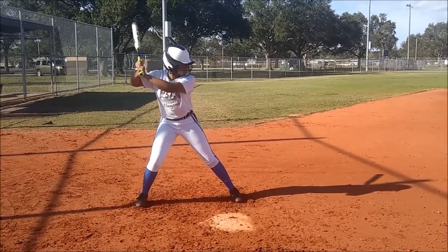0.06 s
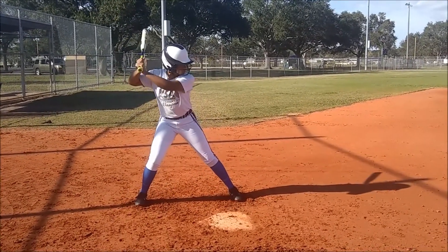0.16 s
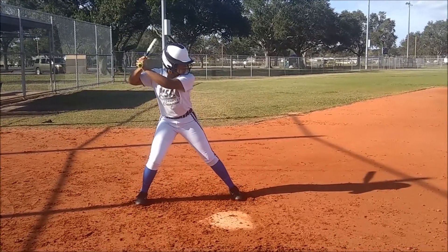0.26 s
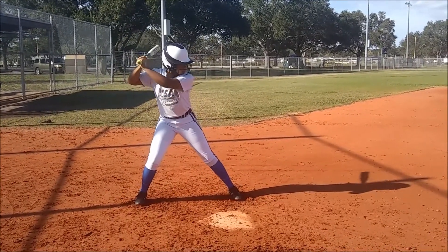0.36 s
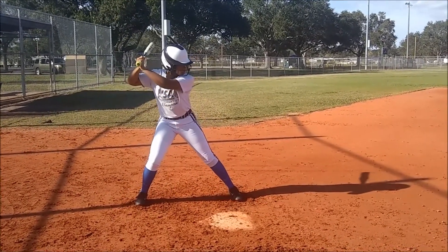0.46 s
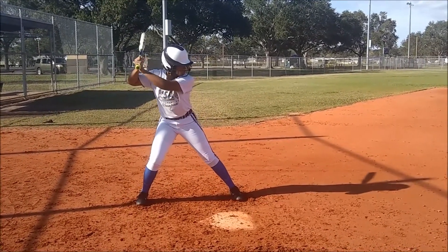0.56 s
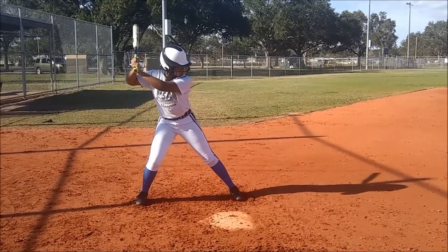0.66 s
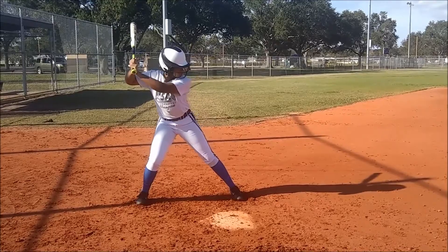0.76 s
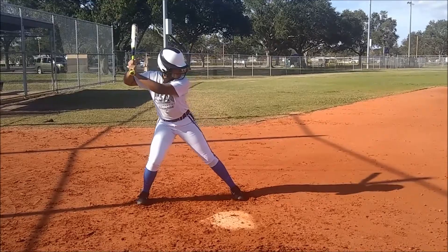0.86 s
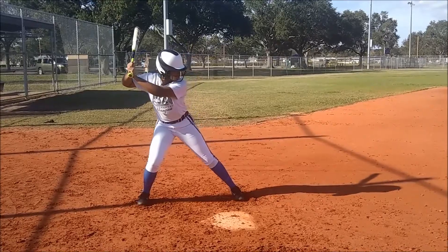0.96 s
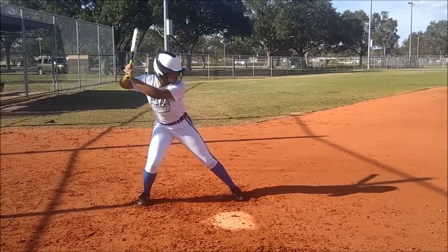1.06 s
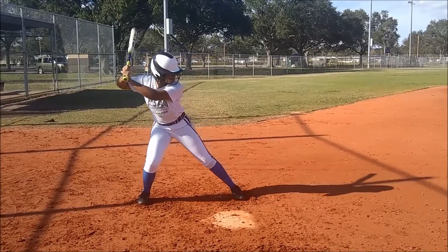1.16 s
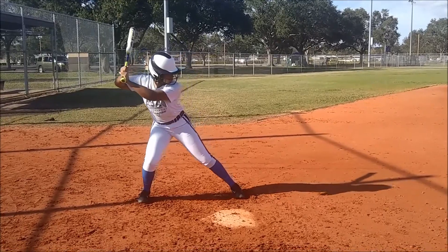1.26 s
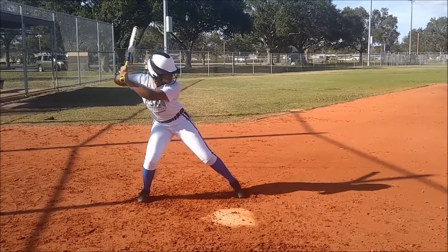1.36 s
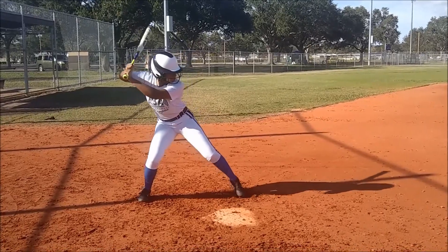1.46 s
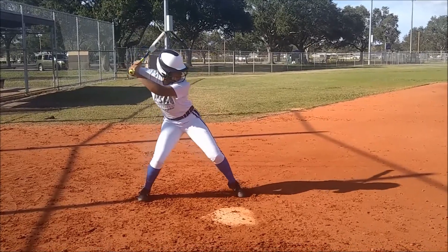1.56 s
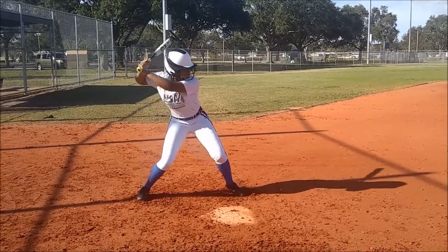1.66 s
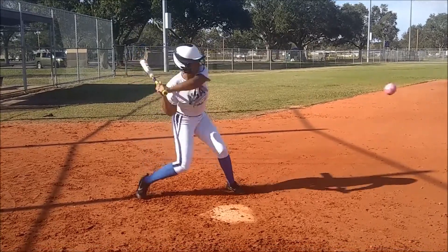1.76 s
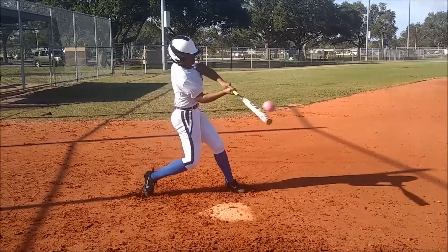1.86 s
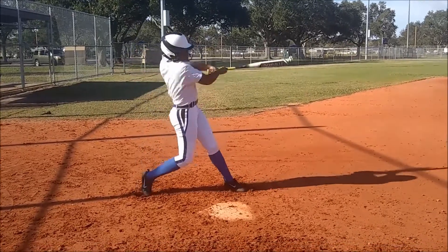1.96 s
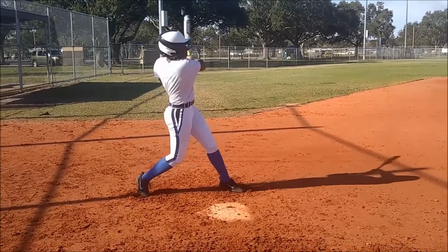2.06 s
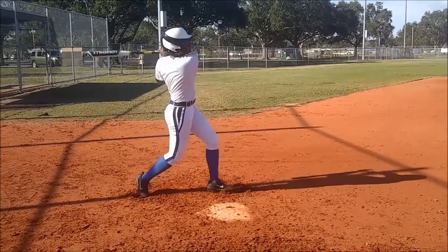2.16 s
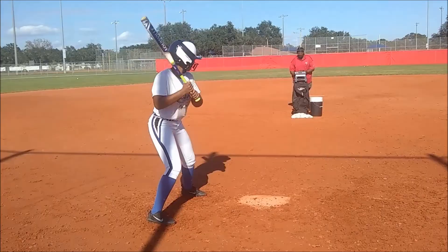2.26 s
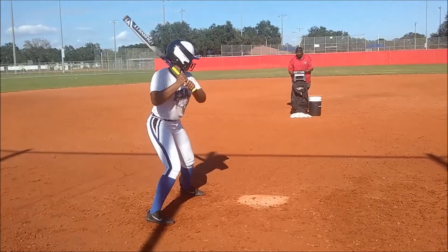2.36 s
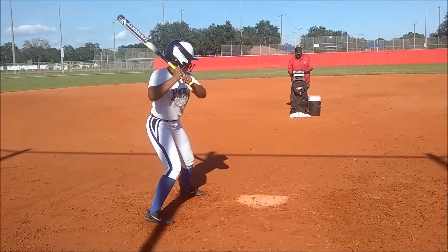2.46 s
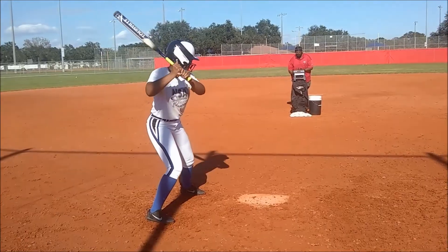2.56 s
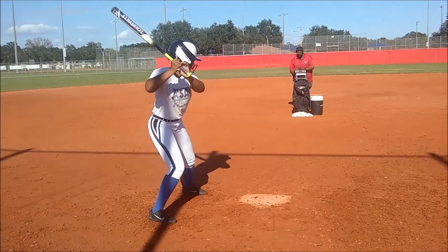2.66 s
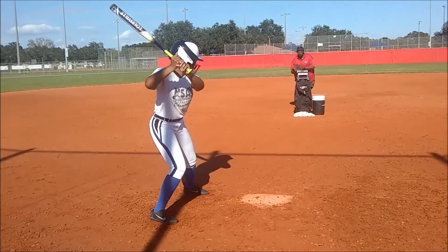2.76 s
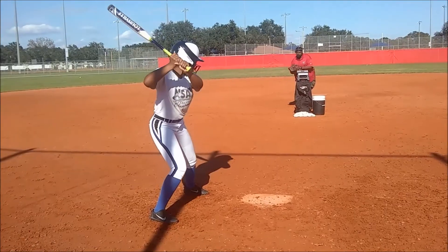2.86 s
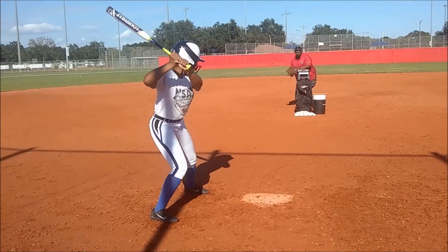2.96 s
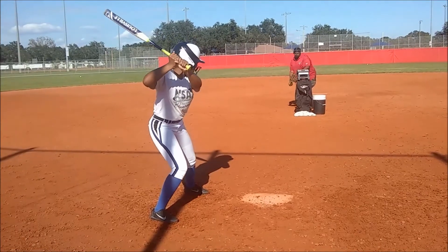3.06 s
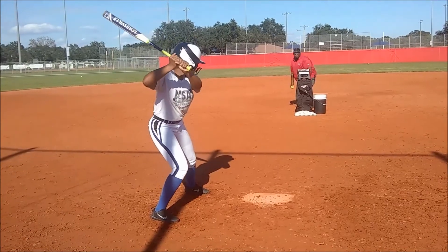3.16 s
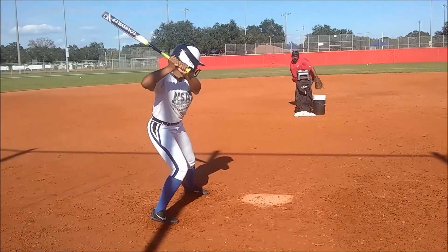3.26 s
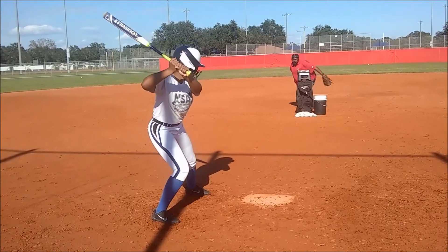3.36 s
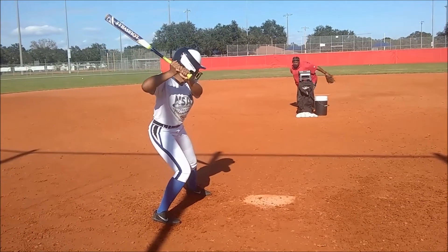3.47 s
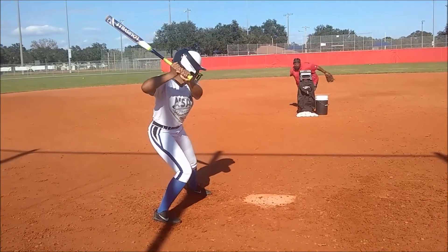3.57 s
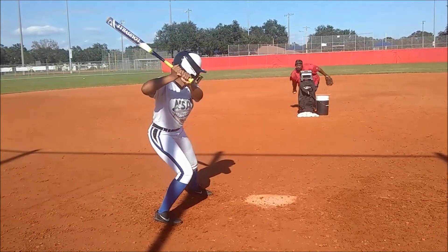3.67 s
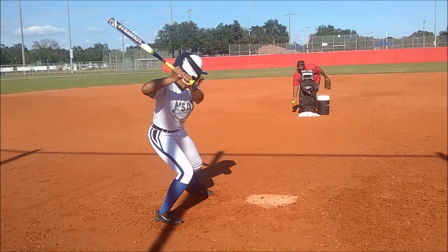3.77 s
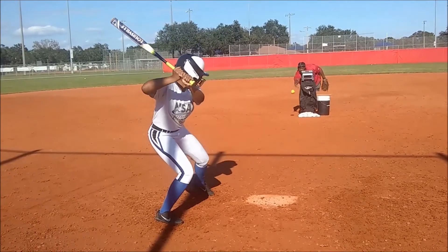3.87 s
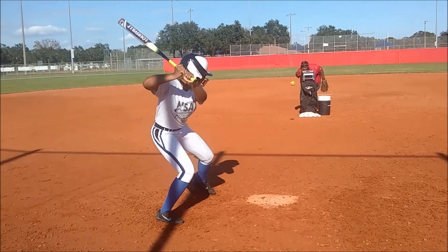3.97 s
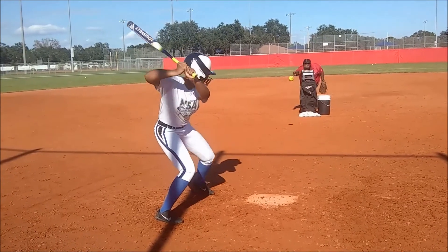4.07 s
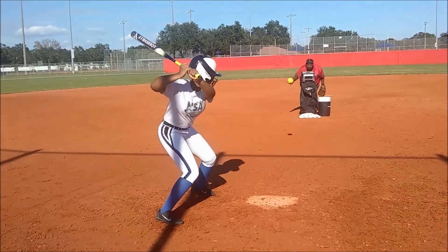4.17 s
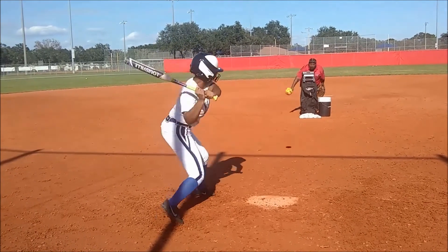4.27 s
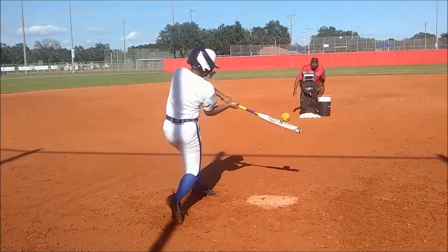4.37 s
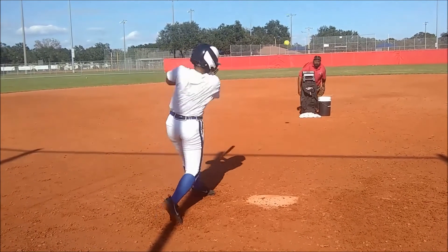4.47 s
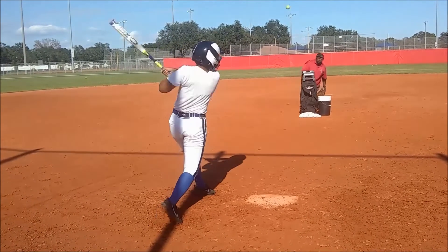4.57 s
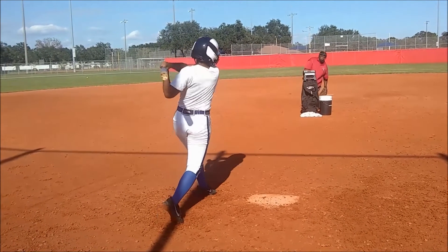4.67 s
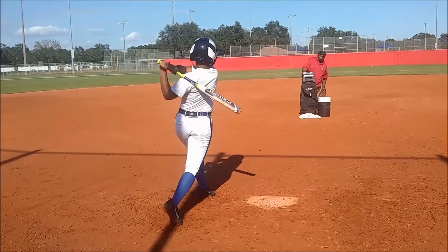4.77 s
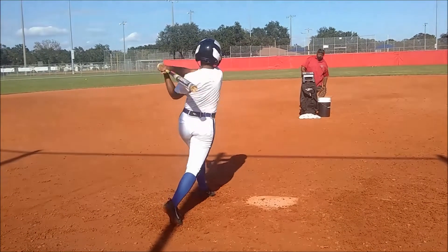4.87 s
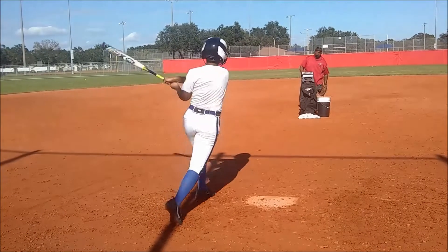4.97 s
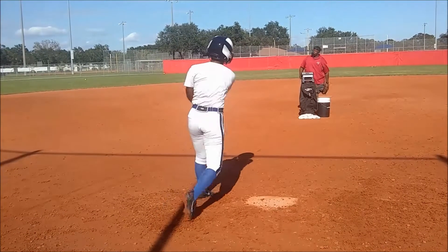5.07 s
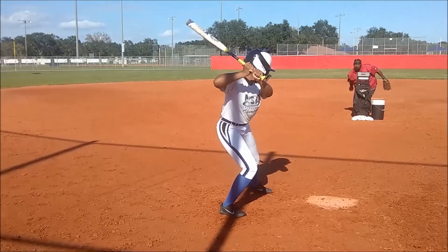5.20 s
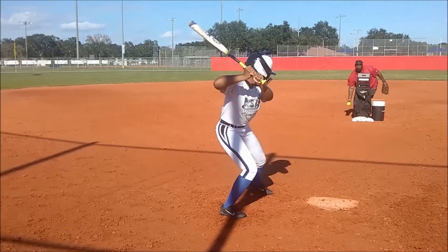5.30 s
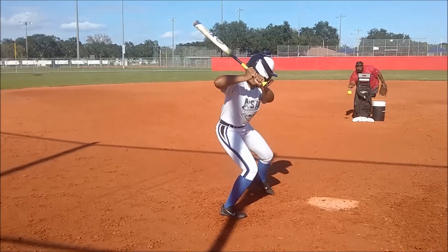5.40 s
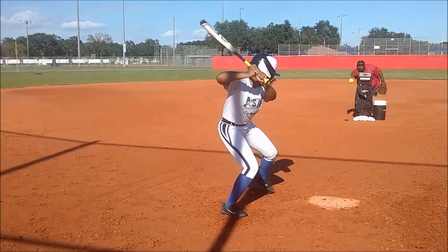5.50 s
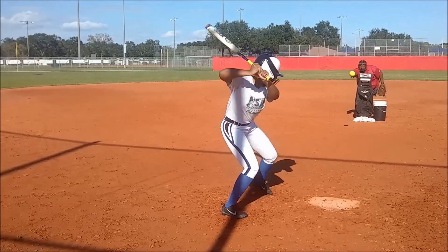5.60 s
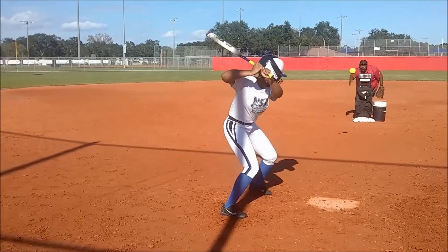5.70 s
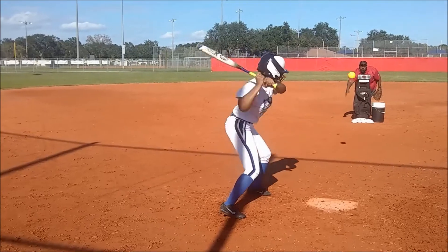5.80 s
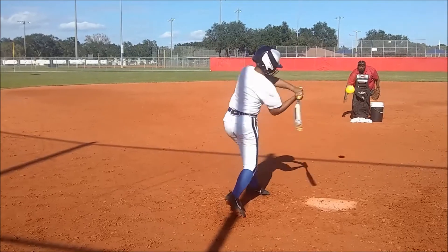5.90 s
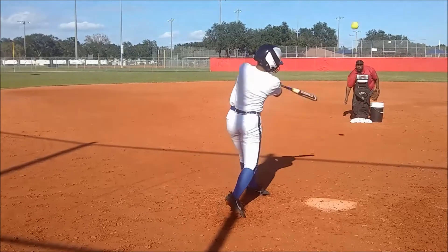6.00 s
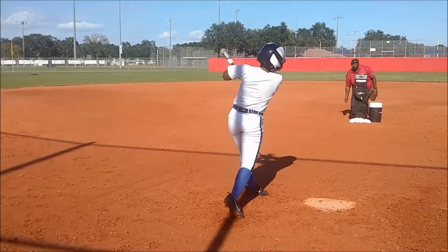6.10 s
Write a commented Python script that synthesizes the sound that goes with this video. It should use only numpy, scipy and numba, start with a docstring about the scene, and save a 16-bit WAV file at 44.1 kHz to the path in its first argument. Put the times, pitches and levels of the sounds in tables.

```python
"""Three softball hits on an open field.

A hollow metal bat cracks and its barrel rings; backstop, ground and fences throw the crack back.
The bat swishes, the batter shifts, far traffic hums and wind buffets mainly the left microphone port.
The two ports are widened by cross-feed, and a gain control ducks after every hit.
Each hit has its own segment, with its own drone and gain; the level dips briefly before the third."""
import sys
import numpy as np
from scipy import signal
from scipy.fft import rfft, irfft
from scipy.io import wavfile
from scipy.ndimage import uniform_filter1d, minimum_filter1d
from numba import njit

SR = 44100
rng = np.random.default_rng(int(sys.argv[2]) if len(sys.argv) > 2 else 0)


def master_out(mix):
    """Clip the mix to full scale and print it as 16-bit PCM to the path in sys.argv[1]."""
    frames = np.transpose(np.atleast_2d(mix))
    ceiling = np.clip(frames, -1, 1)
    pcm = np.round(ceiling * 32767).astype(np.int16)
    wavfile.write(sys.argv[1], SR, pcm)


N = 270774
T = np.arange(N) / SR
SEGMENT_STARTS_S = (0, 2.29, 5.23)


# Ball impacts: (time [s], crack [dB], crack t60 [s], snap [dB], thump [Hz], thump [dB], right lag [ms],
# left minus right [dB], ring build-up [s], ring time left by the grip [ratio])
HITS = [(1.9213, -8.5, 0.034, -12, 525, -0.5, 0.053, 1, 0.00064, 0.59),
        (4.3978, -8, 0.019, -10, 857, -14.5, 0.05, -6, 0.00066, 0.75),
        (5.9855, -10, 0.031, 2, 378, -10.5, 0.059, -3, 0.0034, 0.9)]
# Crack spectrum: (frequency [Hz], density [dB])
CRACK_SPECTRUM = [(200, -11.5), (600, -5.5), (1200, 5), (2500, -7), (5000, -5.5), (8000, -8), (11000, -8),
                  (13800, -16), (14600, -40.5)]
SNAP_T60_S, THUMP_T60_S = 0.006, 0.0098

def bat_hits():
    """Ball on barrel: a noisy crack, a bright snap, a short thump and the ringing shell."""
    noise = diffuse(tint(CRACK_SPECTRUM))
    crack_noise = noise[0] + 0.1 * noise[::-1]  # ground bounce: the ports differ a little
    snap_gains = tint([(3225, -20), (6450, 0), (11500, -1), (14000, -12), (16000, -26)])
    snap_noise = level(diffuse(snap_gains)[0], 0)
    out = np.zeros((2, N))
    for hit, row in enumerate(HITS):
        at_s, crack_db, t60_s, snap_db, thump_hz, thump_db, lag_ms, pan_db, build_s, grip = row
        t = T - at_s
        crack = undb(crack_db) * fall(t, t60_s) * crack_noise
        snap = undb(snap_db) * fall(t, SNAP_T60_S) * snap_noise
        thump = undb(thump_db) * fall(t, THUMP_T60_S) * np.sin(2 * np.pi * thump_hz * t)
        ring = barrel_ring(hit, t, grip) * np.clip(t / build_s, 0, 1)
        direct = snap + thump + ring + barrel_notes(hit)
        out += (crack + [direct, delay(direct, lag_ms)]) * pan(pan_db)
    return out


# Barrel modes: (frequency [Hz])
MODES_HZ = [720, 1075, 1320, 1560, 1945, 2740, 2925, 3402, 3785, 4455, 5460, 6500, 7350]
# Per mode: (t60 [s], level in hit 0 [dB], in hit 1 [dB], in hit 2 [dB])
MODE_DECAYS = [(0.032, -12, -20, -14.5), (.034, -6.5, -15, -5), (0.0093, -18, -18, -28),
               (.02, -25, -8.5, -27), (0.081, -27, -18, -16), (.04, -30, -26.5, -31.5),
               (0.04, -24, -27, -16), (0.061, -23.5, -23.5, -6.5), (0.076, -27.5, -26, -24.5),
               (0.061, -27, -24, -10), (0.031, -10, -10, -10), (0.04, -22, -27.5, -8),
               (0.053, -23.5, -20.5, -19)]
ROUGH_DB = 1.8

def barrel_ring(hit, t, grip):
    """Shell modes, struck at another spot each hit and unsettled by the hands and the swing."""
    ring = 0
    for hz, (t60_s, *hit_db), phase in zip(MODES_HZ, MODE_DECAYS, rng.random(len(MODES_HZ))):
        envelope = undb(hit_db[hit] + ROUGH_DB * walk(200)) * fall(t, grip * t60_s)
        ring += envelope * np.sin(2 * np.pi * (hz * t + phase))
    return ring


# Long barrel notes: (hit [index], time [s], note [index], level [dB], rise [s], hold [s], sag [dB/s])
BARREL_NOTES = [(0, 1.93, 1, -25, .002, .014, 650), (0, 1.956, 0, -48, .006, 0.059, 5),
                (0, 2.005, 1, -51.5, .012, 0.011, 202), (1, 4.402, 0, -19, .002, .042, 330),
                (1, 4.462, 0, -54, .01, .02, 700), (1, 4.49, 1, -65, .012, 0.019, 300),
                (1, 4.747, 0, -68, .001, .035, 150), (2, 6.027, 0, -42.5, .002, .002, 200),
                (2, 6.042, 0, -49.5, .002, 0.013, 350), (2, 6.05, 1, -66, .012, 0.028, 200)]
NOTE_HZ, NOTE_T60_S = (1314, 1070), 0.039

def barrel_notes(hit):
    """Two notes, heard while the turning bat beams them at the microphone or a fence returns them."""
    out = np.zeros(N)
    for owner, at_s, note, db, rise_s, hold_s, sag_db_per_s in BARREL_NOTES:
        if round(owner) == hit:
            t = T - at_s
            held_s = np.clip(t, 0, hold_s)
            gain = undb(db + 2.5 - sag_db_per_s * held_s + ROUGH_DB * walk(120))
            envelope = rise_fall(t - held_s, rise_s, NOTE_T60_S)
            out += gain * envelope * np.sin(2 * np.pi * NOTE_HZ[round(note)] * t)
    return out


# Scatter per hit: (near level [dB], near length [s], far level [dB], far t60 [s])
SCATTER = [(-27.5, .046, -44, .4), (-29.5, .022, -44.5, 0.3), (-35.5, 0.038, -41.5, 0.24)]
# Backstop and fence echoes: (time [s], level [dB], rise [s], t60 [s])
ECHOES = [(1.955, -48.5, .003, .03), (2.141, -67, 0.024, .25), (2.168, -59.5, .005, 0.12),
          (2.262, -58, 0.0074, 0.097), (4.439, -50, .0023, .016), (4.625, -67, .035, .3),
          (4.7445, -50, .0006, 0.049), (6.028, -40.5, .002, .03)]
# Reflected spectrum: (frequency [Hz], density [dB])
REFLECTED_SPECTRUM = [(250, -22.5), (700, -8.5), (1300, -4), (2500, -4), (4000, -1.5), (6000, -3),
                      (9000, -3.5), (13500, -10), (14300, -39.5)]
HUMP_DB, HUMP_HALF_WIDTH_HZ = 7, 94

def reflections():
    """Scatter off mesh, ground and benches, plus distinct echoes, all coloured by the barrel modes."""
    humps = sum(1 / (1 + ((bins_hz() - hz) / HUMP_HALF_WIDTH_HZ) ** 2) for hz in MODES_HZ)
    noise = diffuse(tint(REFLECTED_SPECTRUM) * (1 + undb(HUMP_DB) * humps))
    scatter = 0
    for (at_s, *_), (near_db, near_s, far_db, far_t60_s) in zip(HITS, SCATTER):
        t = T - at_s
        near = undb(near_db) * fall(t, t60_s=0.21) * fall(np.maximum(t - near_s, 0), t60_s=0.098)
        far = undb(far_db) * fall(t, far_t60_s)
        scatter += (near + far) * undb(1.5 * walk(270))
    echoes = sum(undb(db) * rise_fall(T - at_s, rise_s, t60_s) for at_s, db, rise_s, t60_s in ECHOES)
    return noise * (scatter + echoes * undb(2.8 * walk(170)))


# Air past the bat: (time [s], level [dB], rise [s], t60 [s], centre [Hz], width [octaves])
SWINGS = [(1.75, -75.5, .19, .75, 3500, 0.54), (1.9, -64.5, .025, .18, 2402, 2.9),
          (4.3, -72, 0.072, .89, 1507, 1.2), (5.92, -75.5, 0.089, .6, 3430, 0.71)]
# Cloth and dirt: (time [s], level [dB], rise [s], t60 [s], centre [Hz], width [octaves])
RUSTLES = [(.6, -81, .032, 0.17, 9068, .8), (1.37, -76, .03, 0.34, 6950, 2.2),
           (2.61, -78, 0.034, 0.12, 9000, 0.84), (2.655, -70, .003, .03, 2900, .3),
           (3.235, -70, .008, .06, 3200, .4)]
# Footfalls: (time [s], level [dB], rise [s], t60 [s], centre [Hz], width [octaves])
STEPS = [(2.625, -55, 0.0052, .091, 242, 1.1), (3.198, -58, 0.007, .055, 280, 1.15)]
NOISE_TOP_HZ = 14250

def batter_movement():
    """Swishes, rustles and dull steps: gritty bands of noise that swell and die."""
    out, size = np.zeros((2, N)), 32768
    for at_s, db, rise_s, t60_s, hz, octaves in SWINGS + RUSTLES + STEPS:
        edge, skirt = 2 ** (octaves / 2), 4 ** octaves
        band = [(hz / skirt, -30), (hz / edge, 0), (hz * edge, 0), (hz * skirt, -30)]
        gains = tint(band, size) * (bins_hz(size) < NOISE_TOP_HZ)
        noise = np.resize(diffuse(gains, size).T, (N, 2)).T
        grit_db = 3.5 * min(rise_s / 0.016, 1) * walk(150)
        out += undb(db + grit_db) * rise_fall(T - at_s, rise_s, t60_s) * noise
    return out


# Eddy spectrum: (frequency [Hz], density [dB])
EDDY_SPECTRUM = [(12, -22), (30, -6), (60, 0), (130, -6), (300, -20.5), (800, -40), (3000, -80)]
# Steady buffeting: (time [s], level [dB])
BUFFETING = [(0, -65), (1.1, -70.5), (1.85, -60.5), (2, -72), (3, -72.5), (3.8, -59.5), (4.3, -59.5),
             (4.5, -69), (5.2, -70), (5.55, -56), (5.95, -53), (6.14, -59.5)]
# Gusts: (time [s], level [dB], half-width [s])
GUSTS = [(.39, -65, 0.022), (1.252, -64, .1), (2.63, -48, 0.021), (3.204, -56.5, .06), (3.416, -60, 0.027),
         (3.55, -55, 0.026), (3.654, -51.5, .05), (3.972, -50, .03), (4.138, -53.5, 0.031),
         (4.262, -50, .03), (4.92, -54.5, .02), (5.36, -58, 0.029), (5.455, -40.5, .02),
         (5.832, -47.5, 0.02), (5.96, -47.5, 0.028)]
LEE_DB = -8.5

def wind():
    """Eddies on the ports: lumpy rumble, unrelated left and right, weaker on the sheltered right."""
    rumble = irfft(rfft(rng.standard_normal((2, N))) * tint(EDDY_SPECTRUM), N)
    lumps = undb([2.9 * walk(60), 2.5 * walk(23) + LEE_DB])
    steady = undb(np.interp(T, *np.transpose(BUFFETING)))
    gusts = sum(undb(db) * np.exp(-((T - at_s) / width_s) ** 2) for at_s, db, width_s in GUSTS)
    return level(rumble, 0) * lumps * (steady + gusts)


# Traffic spectrum: (frequency [Hz], density [dB])
TRAFFIC_SPECTRUM = [(30, -13), (70, -8), (115, 2.5), (200, -2.5), (400, -15.5), (900, -21.5), (1800, -26),
                    (2500, -33.5), (3100, -31.5), (4200, -35.5), (6000, -36), (12000, -38), (14000, -42)]
TRAFFIC_DB = -58.5

def traffic():
    """Far traffic: octave bands that swell together and flicker alone."""
    gains = tint(TRAFFIC_SPECTRUM) * (bins_hz() < NOISE_TOP_HZ)
    octave = np.log2(bins_hz() / 31.25 + 1e-9)
    out, swell_db = 0, 0.2 * walk(0.97)
    for k in range(10):
        band = gains * np.sqrt(np.clip(1 - abs(octave - k), 0, 1))
        share = np.sqrt(np.sum(band ** 2) / np.sum(gains ** 2))
        out += share * undb(swell_db + 0.49 * walk(8)) * diffuse(band)
    return level(out, TRAFFIC_DB)


# Drone partials, one list per segment: (frequency [Hz], level [dB], left minus right [dB])
DRONES = [
    [(100.4, -65.5, 4), (121.7, -62, 4.5), (148, -65, 4), (211, -72, -0.2)],
    [(102, -64, 3), (120, -67, 3), (247.5, -69.5, 3.5)],
    [(106, -62, 1.5)],
]

def drones():
    """A low, wavering hum under each segment."""
    out, segment = 0, np.searchsorted(SEGMENT_STARTS_S, T, side="right") - 1
    for k, partials in enumerate(DRONES):
        gate = uniform_filter1d(1. * (segment == k), size=441)
        out += gate * sum(wavering_tone(*partial) for partial in partials)
    return out


# Faint notes, the last a swell of the low hum before the third hit: (start [s], end [s], frequency [Hz], level
# [dB], left minus right [dB])
FAR_NOTES = [(0.623, 1.0, 467, -74.5, 3), (1.176, 1.41, 467.4, -70, 7), (1.75, 1.9, 416, -73, 6),
             (5.081, 5.21, 789, -76, 3), (5.52, 5.88, 107.9, -52, 1.5)]

def far_notes():
    """Faint, wavering notes that fade in and out; the last is a swell of the low hum."""
    out = 0
    for start_s, end_s, hz, db, pan_db in FAR_NOTES:
        fade_s = 0.07 * (end_s - start_s)
        gate = np.clip(np.minimum(T - start_s, end_s - T) / fade_s, 0, 1)
        out += np.sqrt(gate) * wavering_tone(hz, db, pan_db)
    return out


def wavering_tone(hz, db, pan_db):
    """A panned sine that drifts in level and pitch."""
    gain = undb(db + 4.1 * walk(9.1))
    cycles = hz * np.cumsum(1 + 0.017 * walk(13)) / SR
    return gain * np.sin(2 * np.pi * cycles) * pan(pan_db)


PORT_SPACING_M, PORT_COHERENCE, SOUND_M_PER_S = 0.21, 0.98, 343

def diffuse(gains, size=N):
    """Unit-RMS noise from all around: the ports agree only for waves longer than their spacing."""
    coherence = PORT_COHERENCE * np.sinc(2 * bins_hz(size) * PORT_SPACING_M / SOUND_M_PER_S)
    mid, side = rfft(rng.standard_normal((2, size))) * gains * np.sqrt([1 + coherence, 1 - coherence])
    return level(irfft([mid + side, mid - side], size), 0)


def walk(rate_hz):
    """Smoothed random steps, spread near 1."""
    hold = int(SR / rate_hz)
    steps = np.repeat(rng.standard_normal(N // hold + 1), hold)
    return 0.78 * uniform_filter1d(uniform_filter1d(steps, hold), hold)[:N]


def fall(t, t60_s):
    """Exponential decay from t = 0, held after 1 s."""
    return (t >= 0) * np.exp(-np.log(1000) * np.clip(t, 0, 1) / t60_s)


def rise_fall(t, rise_s, t60_s):
    """Bell-shaped swell up to t = 0, then exponential decay."""
    return np.where(t < 0, np.exp(-(t / rise_s) ** 2), fall(t, t60_s))


def tint(points, size=N):
    """FFT bin gains from (frequency [Hz], level [dB]) points."""
    hz, db = np.transpose(points)
    return undb(np.interp(np.log(bins_hz(size) + 1), np.log(hz), db))


def bins_hz(size=N):
    return np.arange(size // 2 + 1) * SR / size


def undb(db):
    return 10 ** (np.asarray(db) / 20)


def level(x, rms_db):
    return x * undb(rms_db) / np.sqrt(np.mean(x ** 2))


def pan(db):
    return undb([[db / 2], [-db / 2]])


def delay(x, ms):
    return np.interp(T - ms / 1000, T, x)


def scene():
    """All sources at the two ports; the bat's sounds carry no deep bass."""
    low_cut = signal.butter(2, 170, "high", fs=SR, output="sos")
    bat = signal.sosfilt(low_cut, bat_hits() + reflections())
    return bat + batter_movement() + wind() + traffic() + drones() + far_notes()


@njit
def duck(peaks, threshold, release):
    """Ducking amount: 1 above the threshold, then creeping back to 0."""
    out, amount = np.empty(len(peaks)), 0.
    for i in range(len(peaks)):
        amount = 1. if peaks[i] > threshold else amount * release
        out[i] = amount
    return out


DUCK_DEPTH_DB, DUCK_ABOVE_DB, RELEASE_S = 7.5, -29.5, 2.4
SEGMENT_DB = (4, 5.5, 5.5)

def gain_control(x):
    """Gain that drops at loud peaks and recovers slowly, restarting with each segment."""
    peaks = -minimum_filter1d(-abs(x).max(axis=0), size=441)  # 5 ms look-ahead
    segments = np.split(peaks, (np.array(SEGMENT_STARTS_S[1:]) * SR).astype(int))
    threshold, release = float(undb(DUCK_ABOVE_DB)), np.exp(-1 / (RELEASE_S * SR))
    ducked = np.concatenate([duck(part, threshold, release) for part in segments])
    base_db = np.repeat(SEGMENT_DB, [len(part) for part in segments])
    return undb(base_db + DUCK_DEPTH_DB * (0.5 - uniform_filter1d(ducked, size=221)))


# Cross-feed response: (frequency [Hz], gain [dB])
CROSS_FEED = [(50, -3), (500, -4.5), (3600, -3), (4600, -9.5), (6000, -12), (9000, -18)]
FEED_MS, TOP_HZ = 0.43, 15900
FADE_OUT_AT_S, FADE_OUT_S, FADE_IN_AT_S, FADE_IN_S, DIP_DB = 5.192, 0.0081, 5.253, 0.32, -52

def record(dry):
    """Each side loses a late, duller copy of the other; then gain control, dip, limiter, top cut."""
    opposite = [delay(port, FEED_MS) for port in dry[::-1]]
    wide = dry - irfft(rfft(opposite) * tint(CROSS_FEED), N)
    fade_out = 1 - (T - FADE_OUT_AT_S) / FADE_OUT_S
    fade_in = (T - FADE_IN_AT_S) / FADE_IN_S
    dip = np.clip(np.maximum(fade_out, fade_in), undb(DIP_DB), 1)
    limited = np.tanh(1.1 * wide * gain_control(wide) * dip) / 0.9
    return signal.sosfilt(signal.ellip(8, 0.2, 70, TOP_HZ, fs=SR, output="sos"), limited)


dry = scene()
out = record(dry)
master_out(out)
```